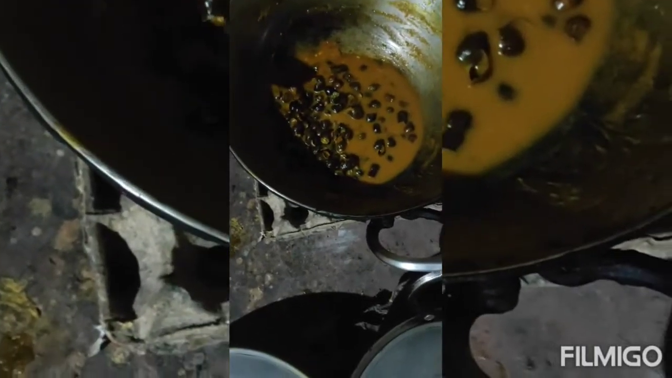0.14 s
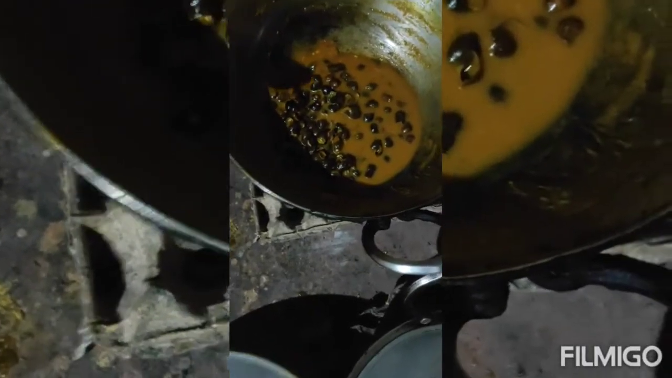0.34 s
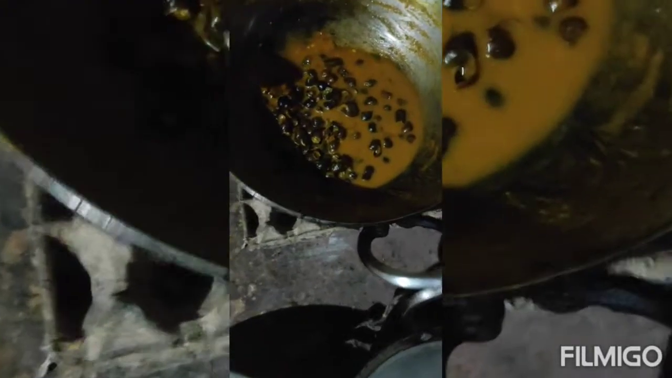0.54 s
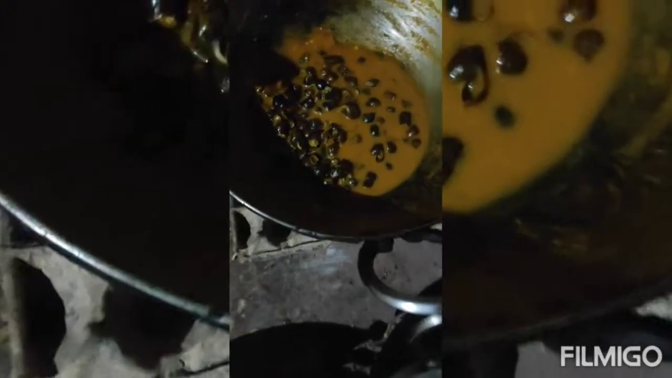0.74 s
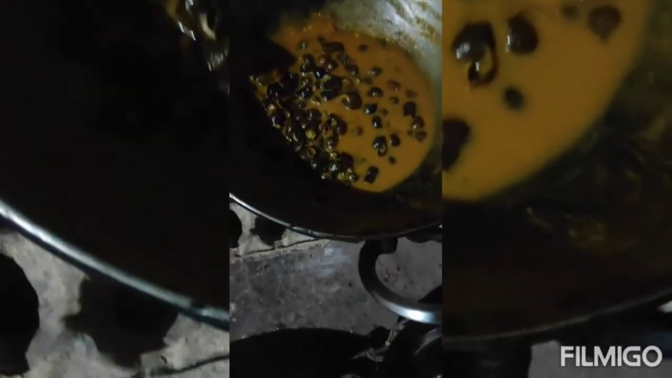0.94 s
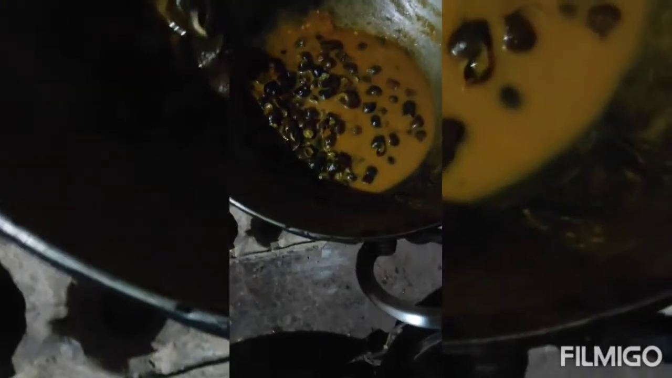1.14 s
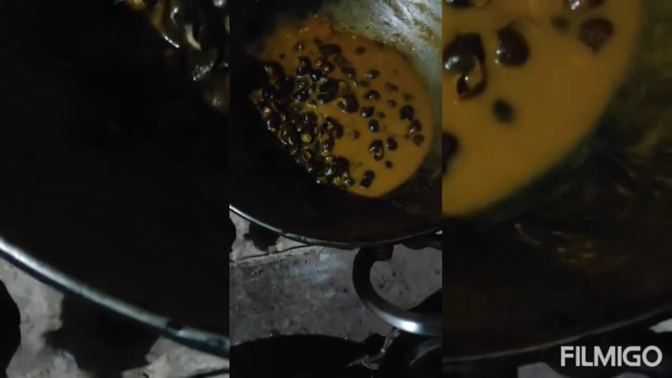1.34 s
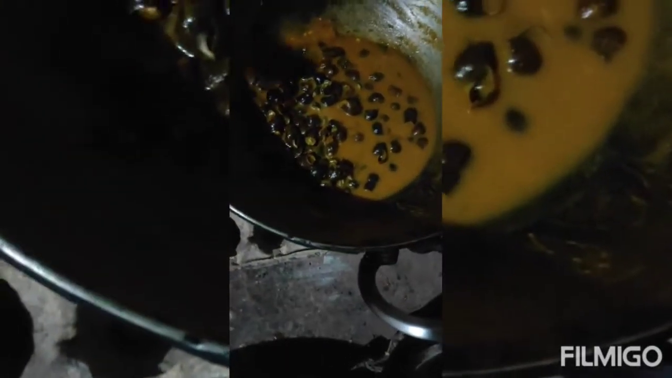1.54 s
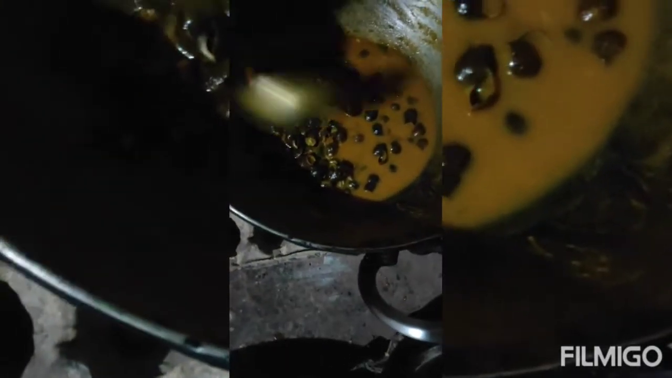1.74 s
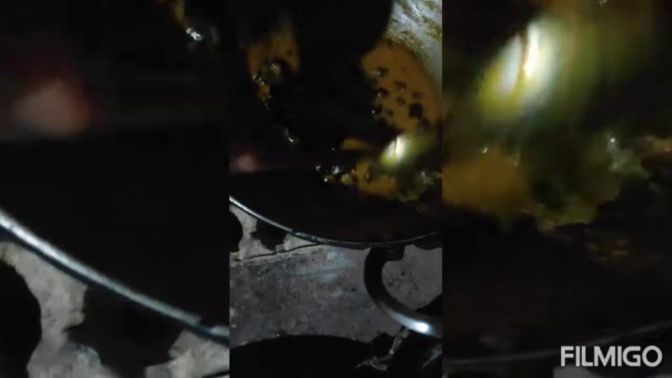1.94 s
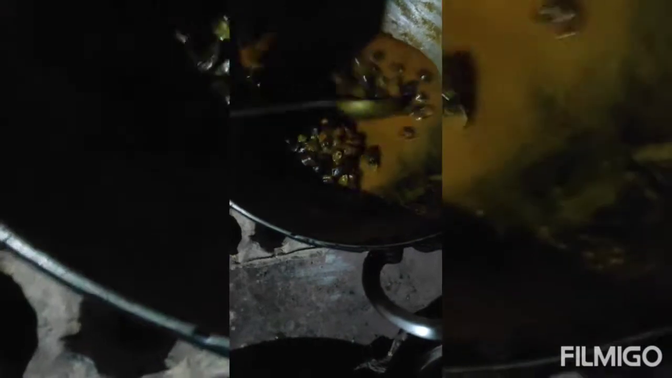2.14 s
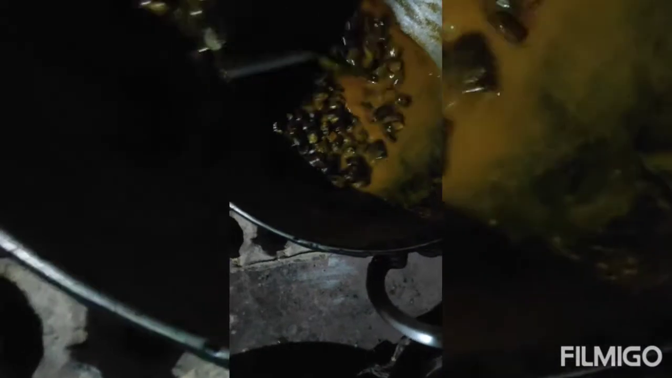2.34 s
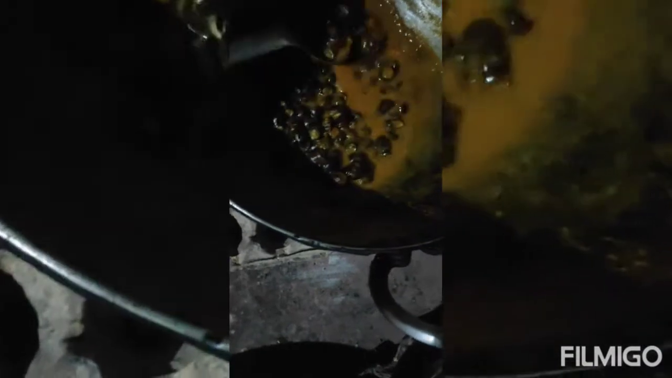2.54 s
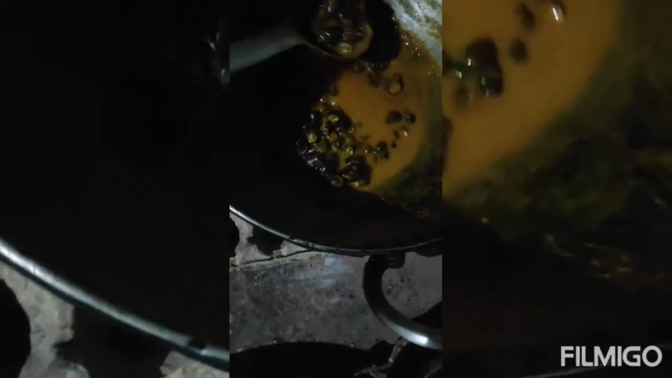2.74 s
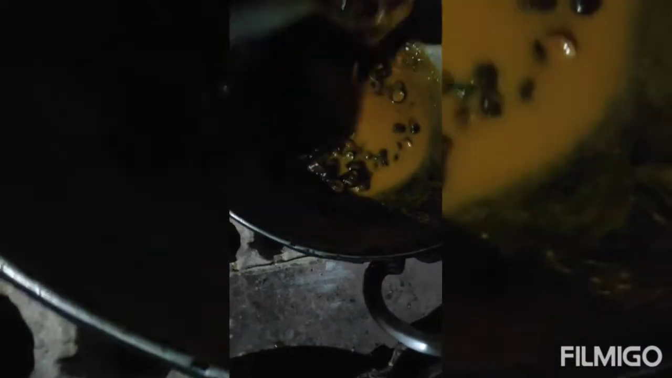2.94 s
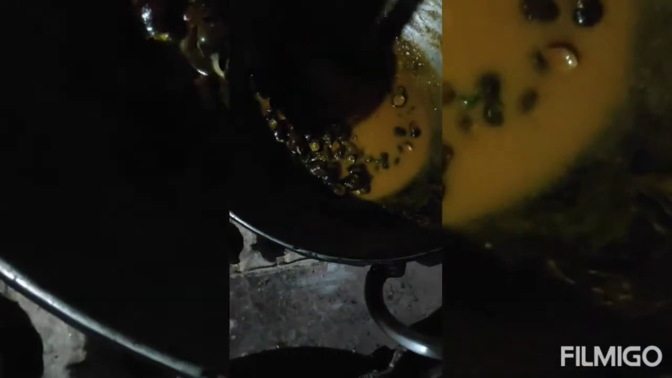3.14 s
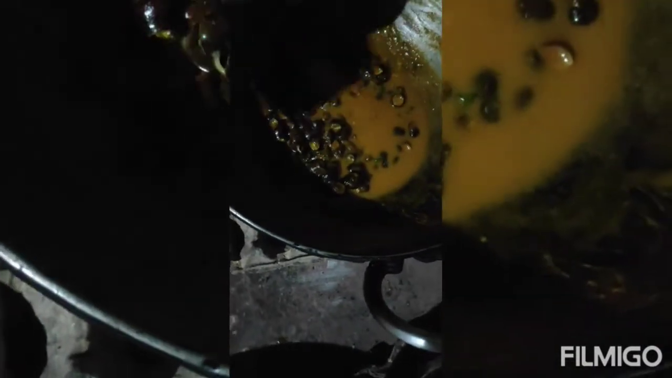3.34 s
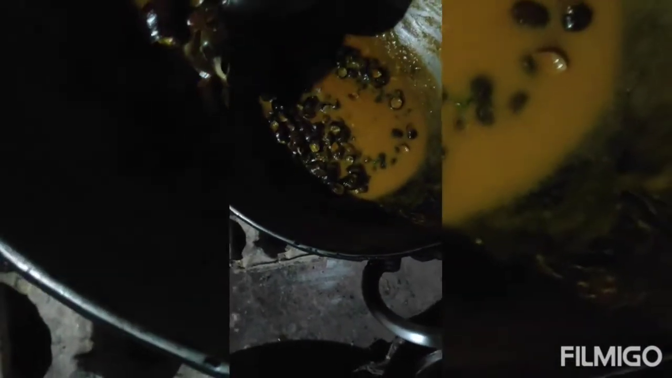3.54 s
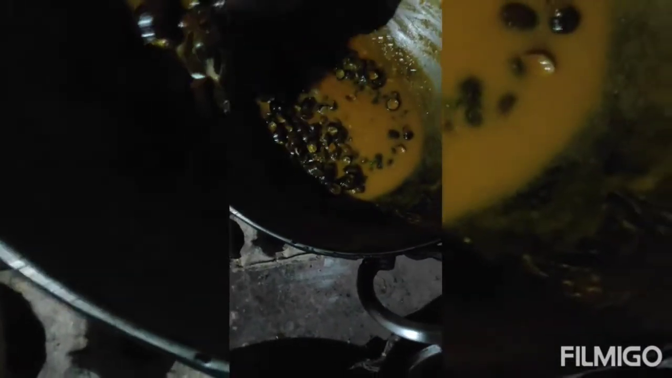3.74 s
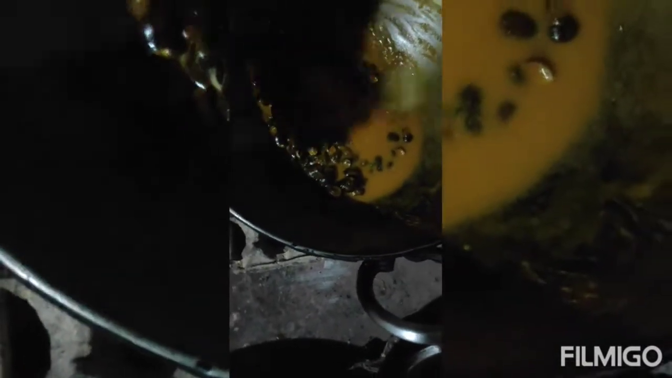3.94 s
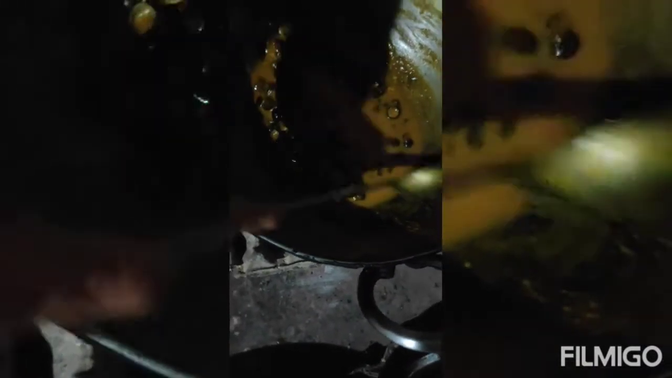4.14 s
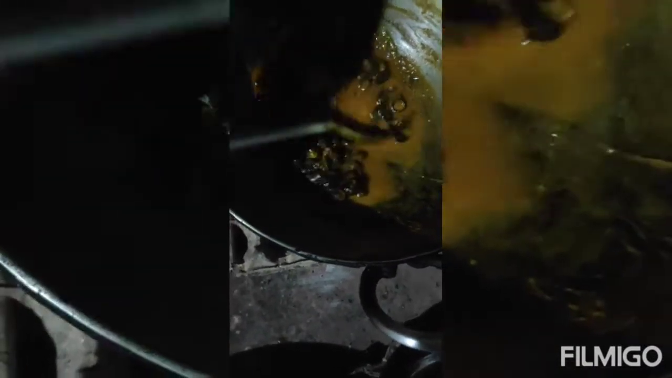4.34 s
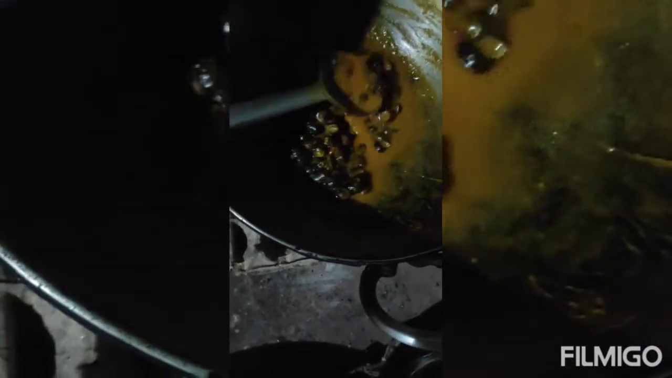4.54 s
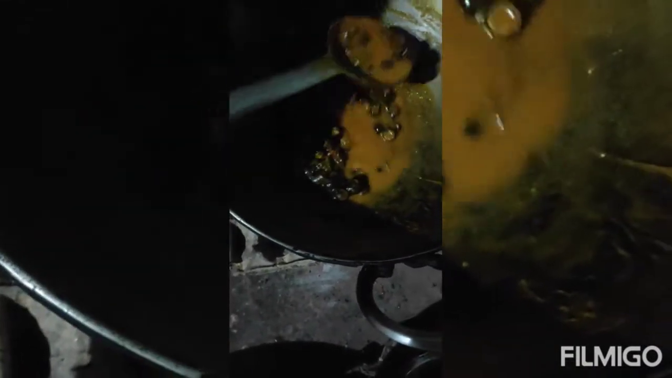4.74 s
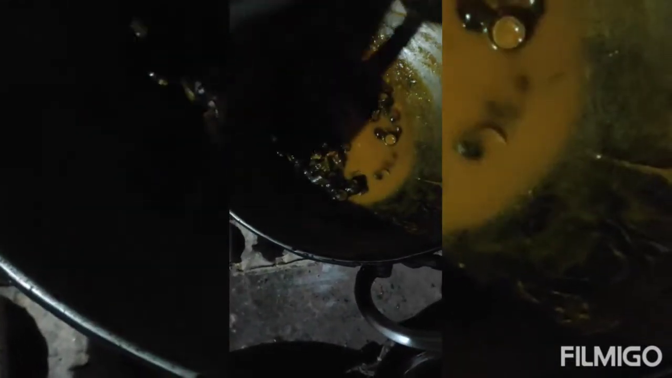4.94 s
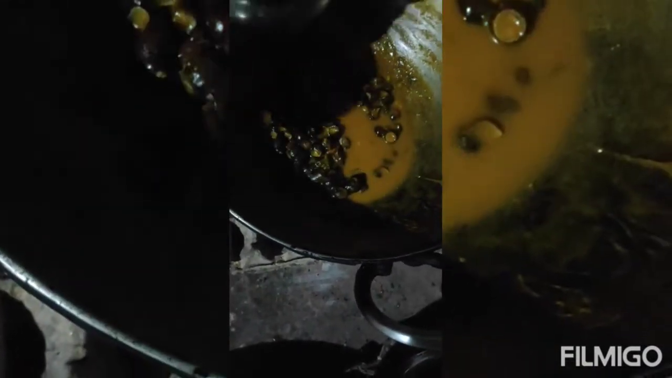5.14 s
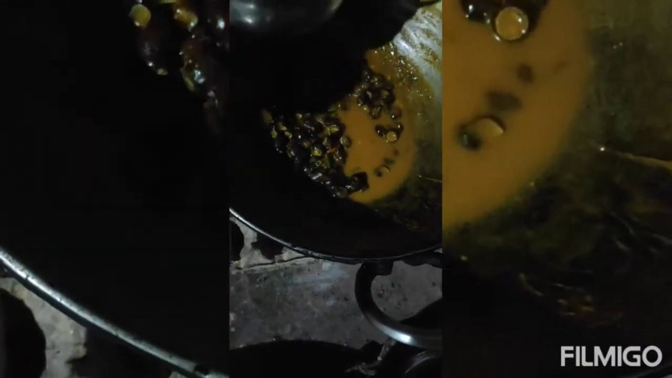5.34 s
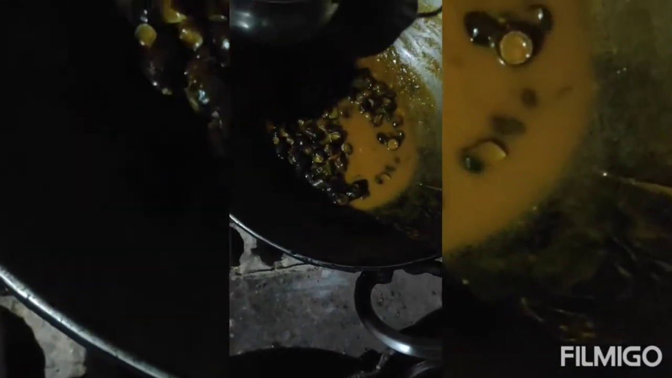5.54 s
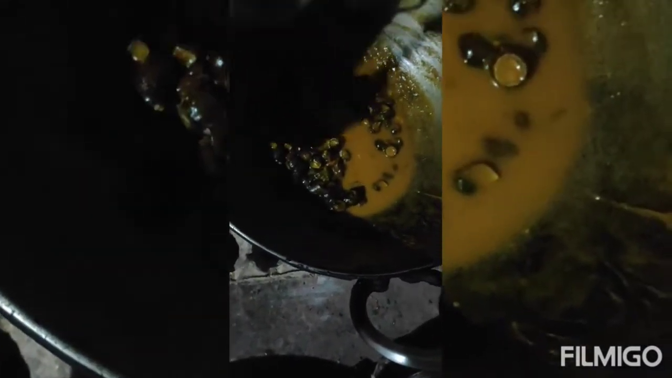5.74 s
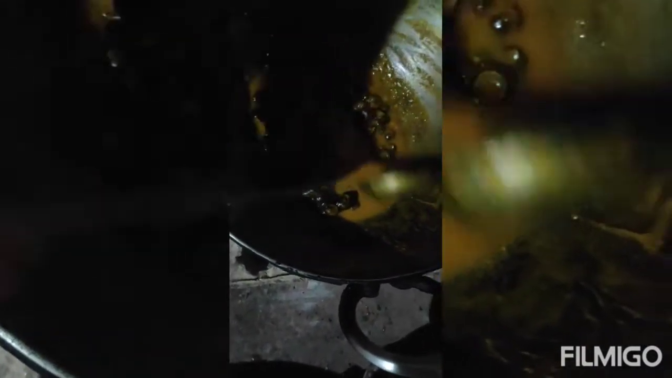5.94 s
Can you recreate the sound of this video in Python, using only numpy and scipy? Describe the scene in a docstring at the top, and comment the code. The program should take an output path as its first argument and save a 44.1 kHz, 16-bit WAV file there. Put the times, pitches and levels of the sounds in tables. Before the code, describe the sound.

A steel ladle scrapes and clinks in a wok of curry in short bursts, over a gas burner's soft hiss.

```python
"""Utensils clink across a small kitchen, over the rumble and hiss of a gas burner.
Then, close by, a steel ladle stirs curry in a wok: twice it lands, scrapes forward, taps as it lifts
and is dragged back. Impacts and stick-slip friction excite the modes of wok and ladle; the sauce damps
the metal, and the wok's wall sounds short hollow notes on the way back. The room reverberates briefly."""
import sys
import numpy as np
from scipy import signal
from scipy.fft import rfft, irfft, next_fast_len
from scipy.io import wavfile
from scipy.ndimage import uniform_filter1d

SR = 44100
rng = np.random.default_rng(int(sys.argv[2]) if len(sys.argv) > 2 else 0)


def master(y):
    """Save y as 16-bit WAV."""
    cut = np.clip(np.atleast_2d(y).T, -1, 1)
    pcm = np.round(cut * 32767)  # scale
    wavfile.write(sys.argv[1], SR, pcm.astype(np.int16))


N = 268128

# backward strokes up the bare wall:
# (touch [s], bite [s], ease-off [s], lift [s], grit level [dB], L-R [dB], wok ring re grit [dB])
PULL_STROKES = [(3.398, 3.407, 3.475, 3.56, -22.5, 1, -13.5), (3.544, 3.555, 3.565, 3.60, -25, -3, -28),
                (3.579, 3.593, 3.62, 3.70, -27, -2, -20), (5.232, 5.25, 5.28, 5.31, -25, -5.5, -25),
                (5.285, 5.302, 5.335, 5.49, -29, 0.5, -9), (5.484, 5.492, 5.55, 5.70, -28.5, 1, -21.5)]
# modes of the sauce-laden bottom, the bare wall and the ladle: (frequency [Hz], level [dB], t60 [s])
BOTTOM_MODES = [(193, -1, 0.033), (290, -0.5, 0.024), (382, 5.5, 0.013), (436, 6, 0.045), (486, 4, 0.047),
                (527, 3, 0.029), (857, 3, 0.03)]
WALL_MODES = [(470, -6, 0.018), (690, 5.5, 0.033), (876, 10, 0.048), (1100, 5.5, 0.028), (1432, 10, 0.034)]
LADLE_MODES = [(1530, -15.5, 0.063), (1748, -1.5, 0.026), (1878, 1.5, 0.04), (2055, 1, 0.035),
               (2505, -3, 0.044), (3284, -4.5, 0.046)]
# spectrum of steel on the bare wall: (frequency [Hz], level [dB])
DRY_SPECTRUM = [(150, -48), (1200, -13.5), (2500, -9.5), (3300, -4.5), (4600, -4.5), (6000, -3),
                (7300, 5.5), (8500, 2.5), (9300, -4), (10400, -9.5), (13500, -16), (16000, -18)]
WOK_WANDER = 0.045  # relative shift of the wok's modes from one contact point to another


def impacts():
    """Impulsive excitation: the bowl strikes the wok, and its rim catches during the strokes."""
    # the bowl lands, bumps or lifts: (time [s], level [dB], wok knock [dB], ladle ring [dB], L-R [dB],
    # ping frequency [Hz], ping [dB], clang at 4-5 kHz [dB], sheen above 10 kHz [dB])
    blows = [(1.963, -1.5, -30, -27, 0.5, 7100, 7, -1.5, -3), (1.9704, 1, -26, -20.5, -1, 7100, 2, -3, -6),
             (1.981, 0, -31, -21, -1, 8370, 1, -1, 6), (1.991, -1.5, -12, -14.5, 4, 8100, 0, 6, -3),
             (2.216, -1, -18, -10.5, 4.5, 6570, 2, -3, -11), (2.555, -12, -44, -19, -9.5, 4230, 13, 6, 8.5),
             (2.712, -9.5, -38, -35, -5.5, 7200, 9, -1, -10), (2.7773, -15, -28, -16, -13, 7470, 8, -1, -8),
             (2.7939, -13, -30, -3.5, -17.5, 7270, 9, 8, 6), (2.801, -9, -19, -10, 11.5, 7400, 2, 4.5, 1),
             (2.9794, -5, -37, -18, -4.5, 7460, 8.5, 0.5, -2), (3.001, -7, -42, -14.5, 2, 7000, 7, -5, -7),
             (3.36, -24.5, -32, -32, -11, 7480, 22, -6, -2),
             (3.3941, -5.5, -27, -34, -5, 7050, 9, 4.5, 5.5), (3.5312, -8, -40, -35, -12, 6810, 13, -6, -1),
             (3.5346, -10.5, -37, -35, 0, 3110, 6.5, 1, -2), (4.176, -6, -12.5, -5, 8, 5700, 7, 7, 3),
             (4.181, -14, -8, -15, 6, 4530, 11, 3, 1), (4.3407, -12, -36, -0.5, -2, 7000, 5, 0, -2),
             (4.439, -14, -40, -4.5, -2, 4400, 6, 5, -13), (4.6852, -4, -37, -14, -2.5, 6680, 4, -0.5, 3),
             (4.6884, -11.5, -35, -13, 3, 5280, 2, 3, -9), (5.2337, -10.5, -42, -38, -8, 8730, 9.5, 0, 9.5),
             (5.4351, -12, -32, -17, -5.5, 6300, 13.5, -7, 5), (5.486, -2.5, -26, -29, 3, 8610, 14, -5, -2),
             (5.826, -20, -18, -28, -10, 5680, -2, -2, -2)]
    # the rim catches: (time [s], level [dB], L-R [dB], ping frequency [Hz])
    catches = [(2.043, -12, -9, 4530), (2.058, -5, -9, 6990), (2.0645, -5.5, 7, 7550),
               (2.115, -4.5, -5, 7340), (2.124, -6.5, -5, 7450), (2.158, -8, 0, 7150),
               (2.166, -4.5, 1, 6900), (2.191, -7.5, -1, 6650), (2.305, -6, 1, 7360),
               (2.458, -10.5, -7.5, 7420), (2.526, -16.5, -1, 7300), (2.5823, -13, -4, 6000),
               (2.634, -17, -3, 7400), (3.411, -5, 1, 8160), (3.49, -13.5, -5, 5600),
               (3.598, -7.5, -8.5, 7590), (3.614, -8.5, -7, 7620), (3.647, -14.5, -9, 7160),
               (3.668, -9.5, -3, 7360), (4.252, -8.5, 0, 8100), (4.271, -4.5, -1, 7800),
               (4.311, -4, 1, 7160), (4.359, -12, -1, 7150), (4.513, -11.5, -8, 7550),
               (4.5395, -15.5, -2, 7940), (5.2891, -8, -3, 8280), (5.2923, -6, 4, 7100),
               (5.369, -12, 0, 7900), (5.3857, -11.5, -2, 8930), (5.4012, -9.5, -2, 7660),
               (5.501, -8.5, 5, 8490), (5.5427, -10, 2, 8470)]
    out = np.zeros((2, N))
    for row in blows:
        add(out, *blow(*row))
    for row in catches:
        add(out, *catch(*row))
    return out


def blow(s, db, knock_db, bowl_db, pan_db, ping_hz, ping_db, clang_db=0, sheen_db=0):
    """An impact excites all modes at once: a crack, a ping, and the lower rings of wok and ladle."""
    contact = steel(t60=0.018, ring_db=-10, ring_t60=0.06, same=0.86, chatter_s=0.0005, uneven_db=2.5)
    colour = [(2800, 0), (3700, clang_db), (5000, clang_db), (6300, 0), (8700, 0), (10500, sheen_db)]
    # steel on steel in the sauce: (frequency [Hz], level [dB])
    wet_spectrum = [(150, -35), (1200, -20), (2500, -12), (3400, -14.5), (4300, -6), (5600, -7.5),
                    (7200, -1), (8300, -3), (9300, -8.5), (10300, -15.5), (12000, -18), (16000, -31)]
    spectrum, wok_modes = (DRY_SPECTRUM, WALL_MODES) if on_wall(s) else (wet_spectrum, BOTTOM_MODES)
    crack = unit_energy(coloured(coloured(contact, colour), spectrum))
    ping = ring([(ping_hz, 0, 0.016)] * 3, same=0.32, wander=0.029)  # a cluster of close modes
    knock = ring(wok_modes, same=0.62, wander=WOK_WANDER, size=4096)
    bowl_modes = [(hz * ladle_tuning(s), level, t60) for hz, level, t60 in LADLE_MODES]
    bowl = ring(bowl_modes, same=0.49, wander=0.017, size=4096)
    out = gain_of(ping_db) * panned(pan_db) * ping
    add(out, 0, gain_of(12) * panned(pan_db) * crack)
    add(out, 0, gain_of(knock_db + 15) * panned(3.7) * knock)
    add(out, 0, gain_of(bowl_db + 15) * bowl)
    return s, gain_of(db) * out


def catch(s, db, pan_db, ping_hz):
    """A glancing impact of the rim, which pings less on the wall than on the bottom."""
    # balance in each place: (wok knock [dB], ladle ring [dB], ping [dB])
    wall_balance = (-27.5, -20.5, 8)
    bottom_balance = (-27.5, -20.5, 11.5)
    knock_db, bowl_db, ping_db = wall_balance if on_wall(s) else bottom_balance
    return blow(s, db, knock_db, bowl_db, pan_db, ping_hz, ping_db)


def stirring():
    """Sliding friction: slips are sparse in the sauce, thick and fast on the bare wall."""
    # forward strokes, bowl down in the sauce: columns as in PULL_STROKES
    push_strokes = [(1.991, 2.044, 2.215, 2.32, -23.5, -0.5, -20.5),
                    (2.302, 2.318, 2.375, 2.49, -27, -2, -16.5), (2.48, 2.49, 2.37, 2.70, -23.5, -4, -24),
                    (4.18, 4.252, 4.355, 4.64, -23, 1, -18)]
    # their grit: (frequency [Hz], level [dB])
    wet_spectrum = [(150, -86), (1200, -21), (2500, -7), (3700, -8.5), (4600, -4.5), (6000, -7.5),
                    (7200, 0.5), (8200, -2.5), (9100, -20.5), (10200, -25), (16000, -29)]
    out = np.zeros((2, N))
    for row in push_strokes:
        add(out, *scrape(row, BOTTOM_MODES, wet_spectrum, grit_db=1, bowl_db=-15, per_s=130, spread_db=4))
        add(out, *ticks(row))
    for row in PULL_STROKES:
        add(out, *scrape(row, WALL_MODES, DRY_SPECTRUM,
                         grit_db=-0.5, bowl_db=-23, per_s=450, spread_db=5))
    return out


def scrape(row, wok_modes, spectrum, grit_db, bowl_db, per_s, spread_db, rock_db=8, points=10):
    """Forced vibration: slips under the stroke crackle in the steel and shake the wok and the ladle."""
    t, pressure_db, pan_db = stroke(row)
    level_db, _, wok_db = row[4:]
    grit_gain = gain_of(level_db + grit_db + pressure_db) * panned(pan_db)
    wok_gain = gain_of(level_db + wok_db + 1.3 * pressure_db) * panned(1.6)
    bowl_gain = gain_of(level_db + bowl_db + 0.93 * pressure_db)
    seated = 1 - np.exp(-((t - t[0]) / 0.014) ** 2)  # the wok speaks only once the bowl lies on it
    # the ladle rocks, so the load wanders between points of its rim, each with its own resonances
    knots = t[0] + np.arange(40) * 0.03
    rocking = [np.interp(t, knots, rng.standard_normal(len(knots))) for _ in range(points)]
    load = gain_of(rock_db * np.array(rocking))
    load *= signal.windows.tukey(len(t), 0.03) / np.linalg.norm(load, axis=0)
    out, shaking = np.zeros((2, len(t) + SR // 2)), 0
    for share in load:
        clicks = share * slips(SR, per_s, spread_db)[:len(t)]
        contact = steel(t60=0.015, ring_db=-3, ring_t60=0.04, same=0.6, chatter_s=0.00034, uneven_db=4)
        wok = ring(wok_modes, same=0.36, wander=WOK_WANDER, size=4096)
        add(out, 0, signal.fftconvolve(clicks * grit_gain, coloured(contact, spectrum), axes=1))
        add(out, 0, signal.fftconvolve(clicks * seated * wok_gain, wok, axes=1))
        shaking = shaking + clicks * bowl_gain
    tail = (0, SR // 10)
    add(out, 0, gliding_ring(np.pad(shaking, tail), LADLE_MODES, np.pad(ladle_tuning(t), tail, "edge")))
    return t[0], out


def stroke(row, glide_db=-9.5, bite_s=0.021, ease_db=-17, drift_db=-6.5):
    """The contact force glides, bites, holds and eases off: (time [s], pressure [dB], L-R [dB])."""
    touch, bite, ease, lift, _, pan_db, _ = row
    t = np.arange(touch, lift, 1 / SR)
    easing = np.clip((t - ease) / (lift - ease), 0, 1)
    gliding = np.clip((bite - t) / bite_s, 0, 1)
    return t, glide_db * gliding + ease_db * easing, pan_db + drift_db * easing


def slips(size, per_s, spread_db):
    """Stick-slip friction releases sparse impulses of very uneven size."""
    strength = gain_of(spread_db * np.minimum(rng.exponential(1, size), 3.5))
    polarity = rng.choice([-1, 1], size)
    return unit_rms(strength * polarity * (rng.random(size) < per_s / SR))


def ticks(row, per_s=16, above_grit_db=9, scatter_db=2, count=8):
    """Lesser impacts of the rim, scattered along a stroke, scale with the contact force."""
    t, pressure_db, pan_db = stroke(row)
    out = np.zeros((2, len(t) + SR // 2))
    for k in range(count):
        at = int((k + rng.random()) * SR / per_s)
        db = row[4] + above_grit_db + scatter_db * rng.standard_normal()
        _, tick = catch(t[0], db, pan_db=0, ping_hz=rng.uniform(5200, 8200))
        if at < len(t):
            add(out, at / SR, gain_of(pressure_db[at]) * panned(pan_db[at]) * tick)
    return t[0], out


def on_wall(s):
    """Whether the contact at time s is on the bare wall, clear of the damping sauce."""
    return any(touch - 0.1 < s < lift + 0.2 for touch, _, _, lift, *_ in PULL_STROKES)


def ladle_tuning(s):
    """Loading shifts the ladle's modes: lower deep in the sauce, higher when pressed up the side."""
    # (time [s], frequency factor [1])
    tuning = [(1.99, 0.85), (2.12, 0.87), (2.215, 1.07), (2.35, 1.18), (2.6, 1.02), (2.8, 0.98),
              (4.27, 1.01), (4.36, 1.046), (4.685, 0.99)]
    return np.interp(s, *np.transpose(tuning))


def steel(t60, ring_db, ring_t60, same, chatter_s, uneven_db, count=22, size=6144):
    """Impulse response at one contact point: a brief chatter, a damped crack, lingering treble modes."""
    t = np.arange(size) / SR
    envelope = (1 - np.exp(-(t / chatter_s) ** 2)) * dying(t, t60)
    crack = pair(*rng.standard_normal((2, size)), same) * envelope
    modes = [(hz, 0, ring_t60) for hz in rng.uniform(2775, 15000, count)]
    response = crack / np.linalg.norm(crack[0]) + gain_of(ring_db) * ring(modes, same, size=size)
    # each point favours some groups of modes and misses others
    groups = [(hz, uneven_db * rng.uniform(-2, 2)) for hz in np.arange(0, SR / 2, 380)]
    return unit_energy(coloured(response, groups))


def ring(modes, same, wander=0.01176, size=16384):
    """Free vibration is a sum of damped modes; the contact point shifts their pitch and phase."""
    t, out = np.arange(size) / SR, 0
    for hz, db, t60 in modes:
        shift, skew, lobe = rng.standard_normal(3)
        ear_phase = np.array([[1], [-1]]) * np.sign(skew) * np.arccos(same) / 2
        envelope = dying(t, t60) * (1 - np.exp(-2 * hz * t))  # builds up within a cycle
        tone = np.cos(2 * np.pi * hz * (1 + wander * shift) * t + ear_phase)
        out = out + np.sign(lobe) * gain_of(db) * envelope * tone
    return unit_energy(out)


def gliding_ring(drive, modes, tuning):
    """Driven resonators follow a tuning curve, with the two channels in quadrature."""
    out, energy = 0, 0
    for hz, db, t60 in modes:
        phasor = np.exp(2j * np.pi * np.cumsum(hz * tuning) / SR)
        pole = dying(1 / SR, t60)
        amplitude = signal.lfilter([1], [1, -pole], drive / phasor)
        out = out + rng.choice([-1, 1]) * gain_of(db) * phasor * amplitude
        energy += gain_of(db) ** 2 / (1 - pole ** 2) / 2
    return np.array([out.real, out.imag]) / np.sqrt(energy)


def wall_notes(waver_depth=0.03):
    """Resonance: the wok's wall sounds short, hollow notes as the ladle is dragged back."""
    # (time [s], duration [s], frequency [Hz], level [dB])
    notes = [(3.41, 0.031, 868, -36), (3.49, 0.042, 900, -47), (3.548, 0.021, 680, -36),
             (3.598, 0.025, 690, -39), (3.648, 0.022, 693, -40.5), (5.30, 0.02, 907, -43),
             (5.507, 0.021, 1037, -32)]
    out = np.zeros((2, N))
    for s, length, hz, db in notes:
        u = np.linspace(0, 1, round(length * SR))
        waver = unit_rms(uniform_filter1d(rng.standard_normal(len(u)), size=200))
        note = np.sin(2 * np.pi * np.cumsum(hz * (1 + waver_depth * waver)) / SR)
        add(out, s, gain_of(db) * panned(1.7) * np.sin(np.pi * u ** 1.03) * note)
    return out


def ears(x, lag_samples=6):
    """Interaural differences: the wok's treble reaches the sides unevenly, and the left one later."""
    # (frequency [Hz], L-R [dB])
    balance = [(2500, 1.5), (4000, 0.5), (6000, -3.5), (8000, 0.5), (10000, 2), (12500, -1.5)]
    size = next_fast_len(N + SR // 10)
    hz = np.fft.rfftfreq(size, 1 / SR)
    left, right = irfft(rfft(x, size) * panned(curve_at(balance, hz)), size)[:, :N]
    return np.array([np.roll(left, lag_samples), right])


def utensils():
    """Distant steelware, once struck, gives a smeared clatter and rings on in its modes."""
    # (time [s], level [dB], ring offset [dB])
    clinks = [(0.0, -29.5, -12.5), (0.511, -35, -28), (1.112, -26.5, 4), (1.134, -30, -4),
              (1.16, -31.5, 5.5), (3.914, -34.5, -32), (6.044, -33, -25)]
    # (frequency [Hz], level [dB], t60 [s])
    modes = [(854, -12.5, 0.11), (1280, -3.5, 0.074), (2471, 0, 0.1), (2525, 3, 0.17), (2580, 1, 0.19),
             (2610, 4, 0.07), (2680, 1, 0.13), (2748, 0, 0.13), (2976, -2, 0.22), (3330, -1.5, 0.12),
             (5390, 3.5, 0.084)]
    # the clatter: (frequency [Hz], level [dB])
    spectrum = [(500, -17.5), (2700, -9.5), (3800, -13), (5400, -9.5), (6300, -6), (7800, 5),
                (8600, -4), (10000, -26), (16000, -38)]
    out = np.zeros((2, N))
    for s, db, ring_db in clinks:
        clatter = steel(t60=0.12, ring_db=-4.5, ring_t60=0.18, same=0.55, chatter_s=0.0022, uneven_db=1.5)
        add(out, s, gain_of(db + 27) * coloured(clatter, spectrum))
        add(out, s, gain_of(db + ring_db + 26) * ring(modes, same=0.16, wander=0.0246))
    return out


def rustles():
    """Amplitude-modulated noise: soft mid-range puffs swell quickly and fade."""
    # (time [s], duration [s], level [dB])
    puffs = [(0.485, 0.17, -44.5), (5.717, 0.2, -44.5)]
    # (frequency [Hz], level [dB])
    spectrum = [(500, -21), (900, -6.5), (1250, 10.5), (1600, -10), (2050, 3.5), (3000, -9), (6000, -20)]
    out = np.zeros((2, N))
    for s, length, db in puffs:
        u = np.linspace(0, 1, round(length * SR))
        add(out, s, gain_of(db) * np.sin(np.pi * np.sqrt(u)) * rng.standard_normal((2, len(u))))
    return coloured(out, spectrum)


def burner():
    """A gas flame radiates broadband noise: a low rumble and a hiss."""
    # both: (frequency [Hz], level [dB])
    rumble_spectrum = [(15, -24), (27, -9.5), (35, 7), (49, -17.5), (60, 0.5), (76, -19.5), (102, -8.5),
                       (125, -17.5), (160, -9), (200, -9), (310, -27), (420, -38)]
    hiss_spectrum = [(180, -19.5), (400, -5), (900, -5), (1600, -6), (2800, -7.5), (3800, -13.5),
                     (5600, -12), (6300, -9.5), (7100, 0.5), (8200, -3.5), (8800, -9.5), (9700, -23),
                     (11000, -25.5), (16000, -35)]
    rumble = flame_noise(rumble_spectrum, db=-49.5, patchy_db=3, swell_db=-0.5, size=8192)
    hiss = flame_noise(hiss_spectrum, db=-42.5, patchy_db=2.5, swell_db=0.3, size=2048)
    return rumble + hiss


def flame_noise(spectrum, db, patchy_db, swell_db, size):
    """Partly coherent stereo noise with drifting spectral patches and a slow swell."""
    # (frequency [Hz], left-right correlation [1])
    coherence = [(60, 0.9), (130, 0.91), (290, 0.76), (640, 0.27), (1410, 0), (3100, 0), (6820, 0.63),
                 (15000, 1)]
    # (frequency [Hz], L-R [dB])
    balance = [(60, 1.5), (110, 8.5), (200, 4), (380, 5.5), (700, 2), (1290, 4), (2380, 0), (4400, -3),
               (8120, -2.5), (15000, 2)]
    hop, hz = size // 4, np.fft.rfftfreq(size, 1 / SR)
    a, b, c, d, patches = rng.standard_normal((5, N // hop + 5, len(hz)))
    patches = uniform_filter1d(patches, size=6, axis=0)  # smooth in time
    patches = unit_rms(uniform_filter1d(patches, size=20, axis=1))  # and in frequency
    swell = unit_rms(uniform_filter1d(rng.standard_normal(len(a)), size=20))[:, None]
    frames = pair(a + 1j * b, c + 1j * d, curve_at(coherence, hz))
    frames *= panned(curve_at(balance, hz))[:, None]
    frames *= gain_of(curve_at(spectrum, hz) + patchy_db * patches + swell_db * swell)
    noise = signal.istft(frames.transpose(0, 2, 1), nperseg=size, noverlap=size - hop)[1][:, :N]
    return gain_of(db) * noise / np.std(noise.mean(0))


def kitchen(x, onset_s=0.0011):
    """Reverberation: dense reflections off hard walls, each band decaying at its own rate."""
    # (frequency [Hz], t60 [s])
    decay_times = [(200, 0.37), (800, 0.27), (2500, 0.24), (7000, 0.27), (14000, 0.083)]
    hz, t, frames = signal.stft(rng.standard_normal((2, SR // 2)), SR, nperseg=256)
    tail = signal.istft(frames * dying(t, curve_at(decay_times, hz)[:, None]), SR)[1]
    build_up = 1 - np.exp(-(np.arange(tail.shape[1]) / SR / onset_s) ** 2)
    tail = pair(*tail, same=0.21) * build_up
    return signal.fftconvolve(x, tail / np.linalg.norm(tail[0]), axes=1)[:, :N]


def gain_of(db):
    """Decibels to an amplitude ratio."""
    return 10 ** (np.asarray(db) / 20)


def unit_rms(x):
    """Normalises to mean power 1."""
    return x / np.sqrt(np.mean(x ** 2) + 1e-20)


def unit_energy(x):
    """Normalises stereo to a mean energy of 1 per channel."""
    return x / np.sqrt((x ** 2).sum() / 2)


def curve_at(points, hz):
    """Interpolates on a log-frequency axis."""
    f, value = np.transpose(points)
    return np.interp(np.log(hz + 1), np.log(f + 1), value)


def add(mix, s, sound):
    """Superposes a stereo sound at time s."""
    part = mix[:, max(round(s * SR), 0):][:, :sound.shape[1]]
    part += sound[:, :part.shape[1]]


def panned(db):
    """Left and right gains for a level difference."""
    return gain_of(np.array([[1], [-1]]) * db / 2)


def dying(t, t60):
    """Exponential decay of 60 dB in t60 seconds."""
    return np.exp(-np.log(1000) * t / t60)


def pair(a, b, same):
    """Two channels with correlation `same` from two independent signals."""
    return np.array([a, same * a + np.sqrt(1 - same ** 2) * b])


def coloured(x, spectrum, size=2048):
    """Minimum-phase filter of energy 1 with the given spectral shape."""
    log_gain = np.log(gain_of(curve_at(spectrum, abs(np.fft.fftfreq(size, 1 / SR)))))
    taps = np.fft.ifft(np.exp(np.conj(signal.hilbert(log_gain)))).real
    return signal.oaconvolve(x, taps[None] / np.linalg.norm(taps), axes=1)[:, :x.shape[1]]


def scene():
    """The direct-to-reverberant ratio falls with distance: the ladle is dry, far things mostly room."""
    near = ears(impacts() + wall_notes() + stirring())
    far = utensils() + rustles()
    flame = burner()
    room = kitchen(gain_of(-6) * near + gain_of(0.5) * far)
    return near + gain_of(-4) * far + room + flame


def record(dry, edge_hz=16100):
    """Soft saturation rounds the hardest blows; a low-pass filter then limits the band."""
    low_pass = signal.firwin(511, edge_hz, window=("kaiser", 9), fs=SR)
    return signal.oaconvolve(np.tanh(dry), low_pass[None], "same")


dry = scene()
out = record(dry)
master(out)
```